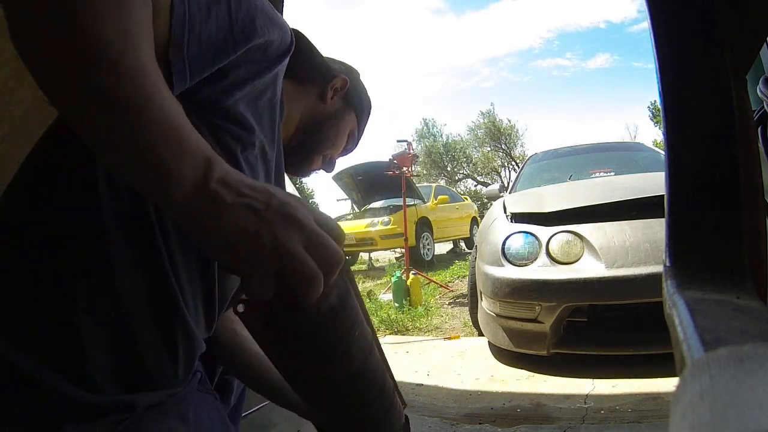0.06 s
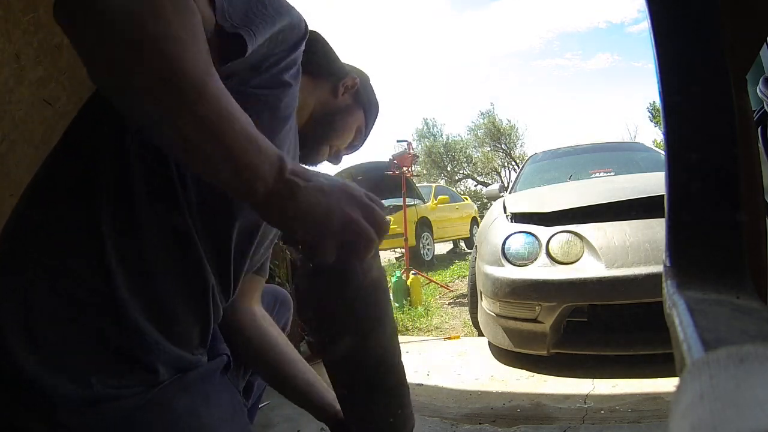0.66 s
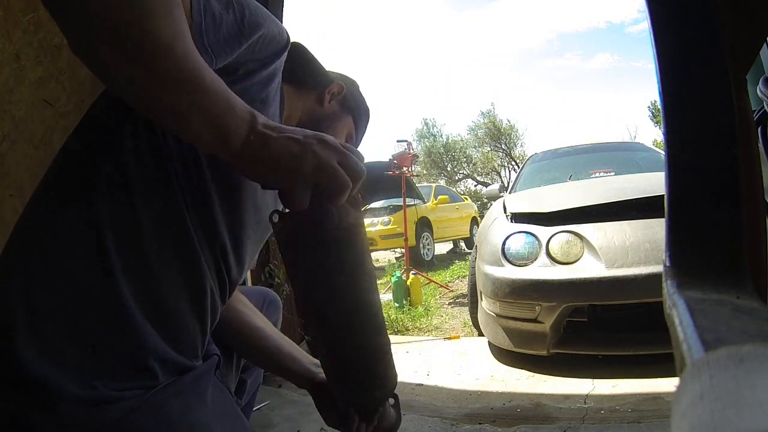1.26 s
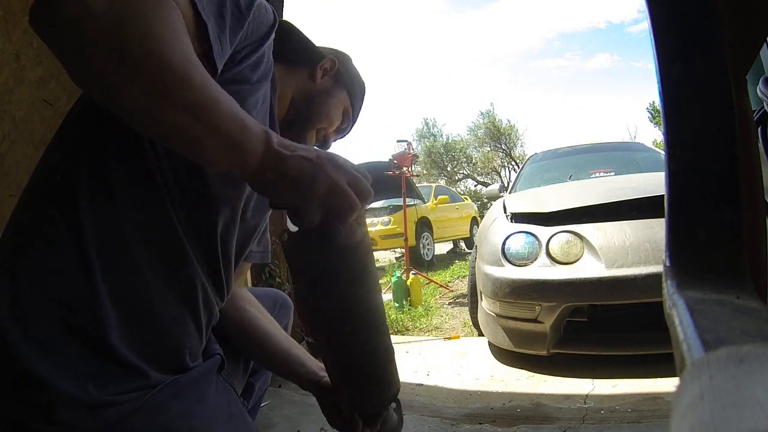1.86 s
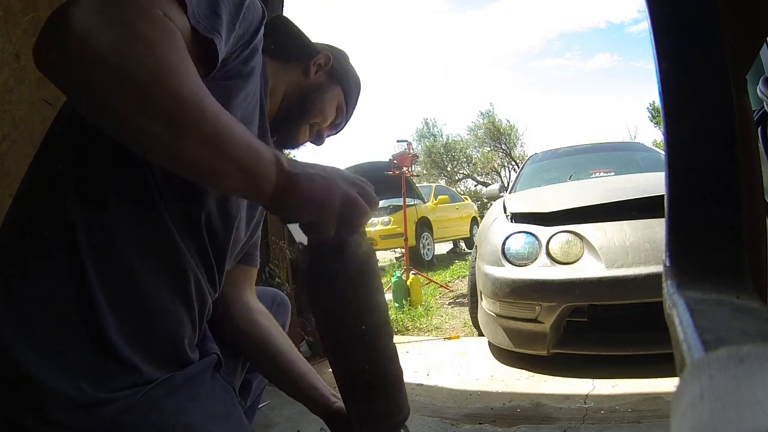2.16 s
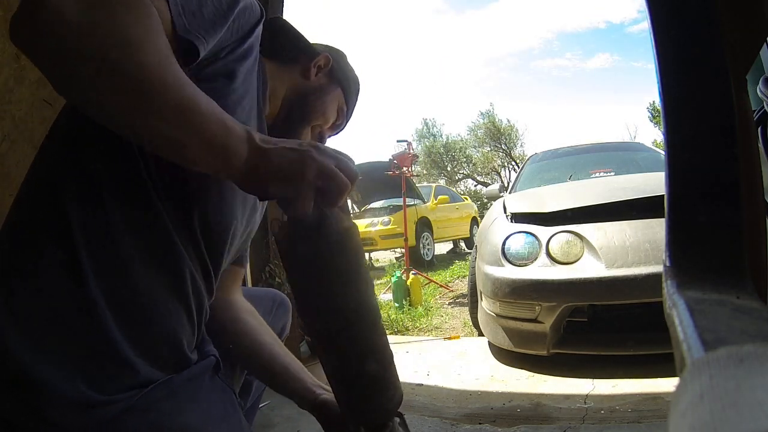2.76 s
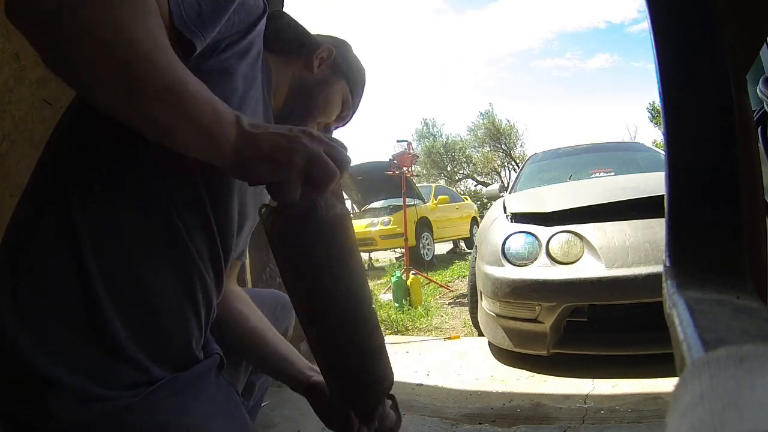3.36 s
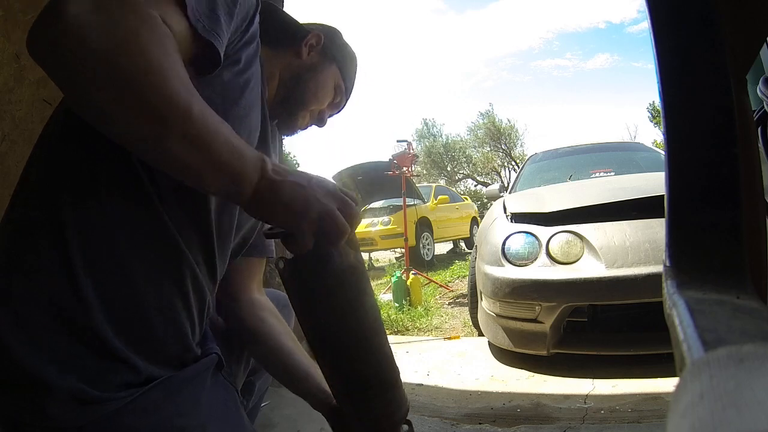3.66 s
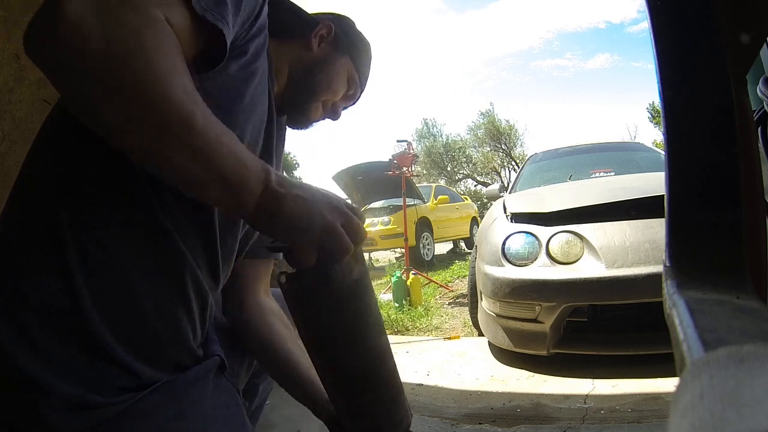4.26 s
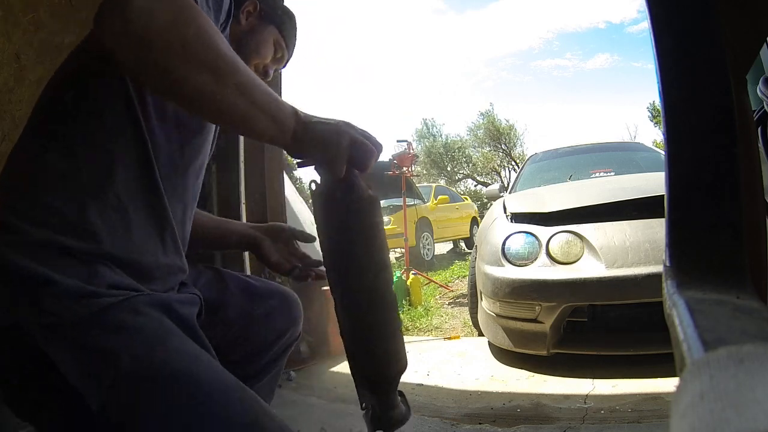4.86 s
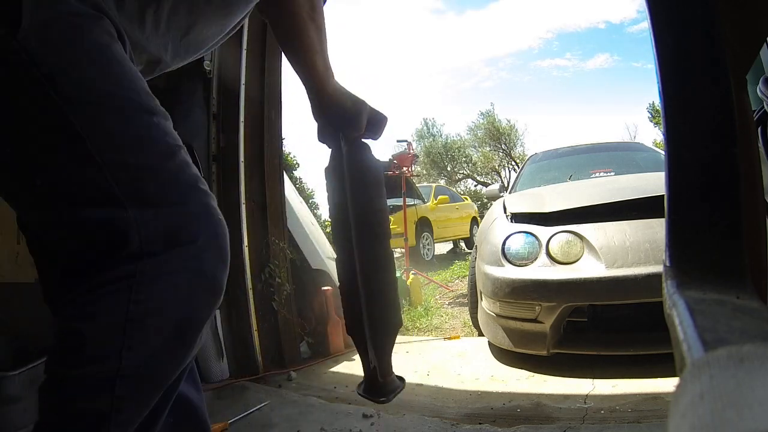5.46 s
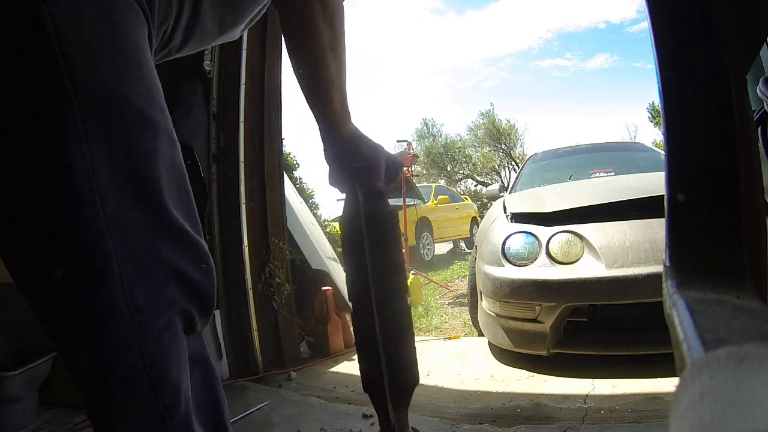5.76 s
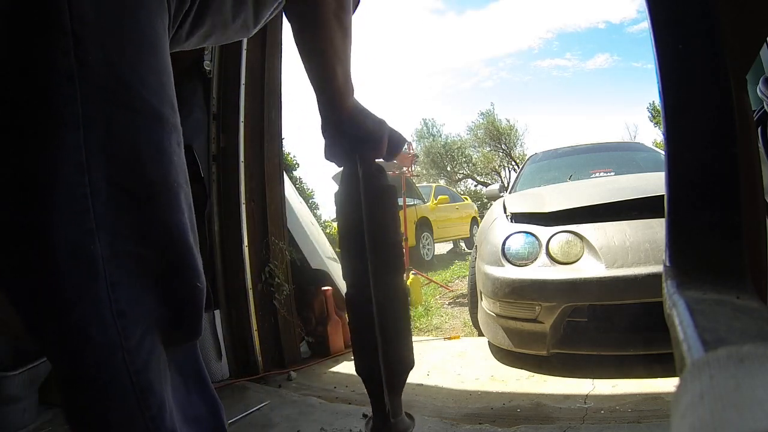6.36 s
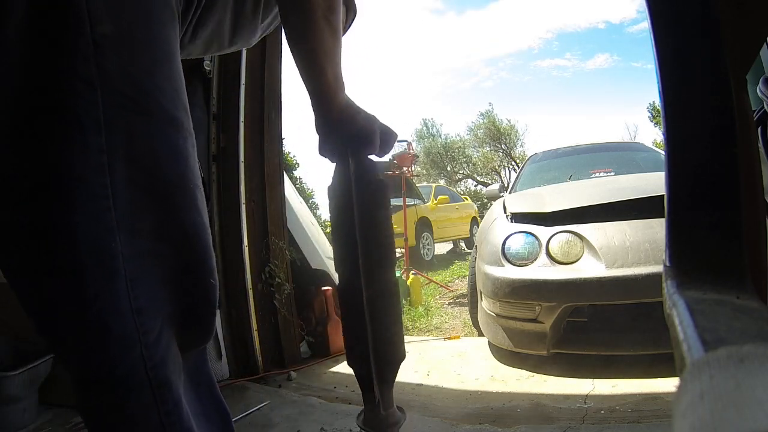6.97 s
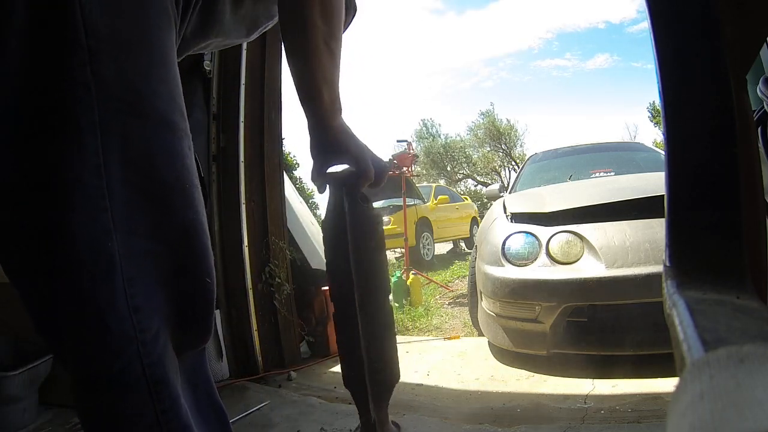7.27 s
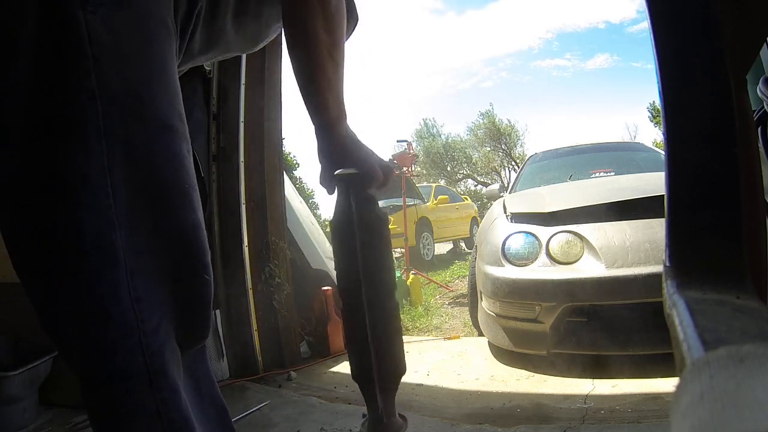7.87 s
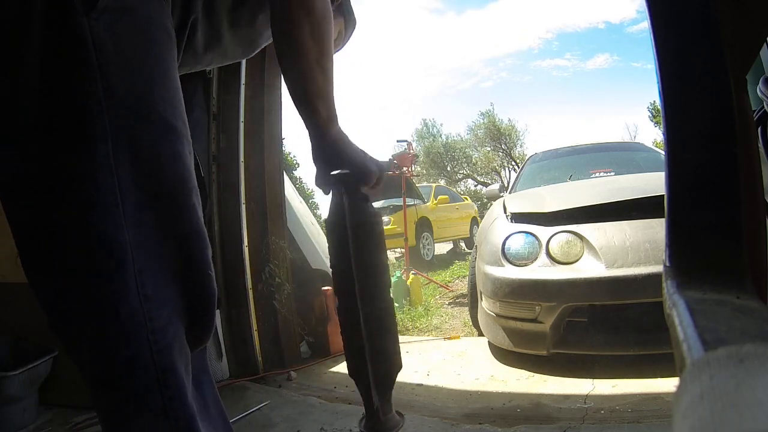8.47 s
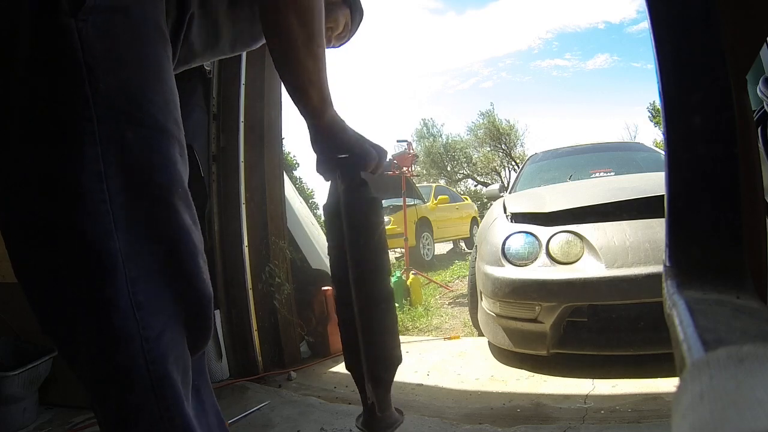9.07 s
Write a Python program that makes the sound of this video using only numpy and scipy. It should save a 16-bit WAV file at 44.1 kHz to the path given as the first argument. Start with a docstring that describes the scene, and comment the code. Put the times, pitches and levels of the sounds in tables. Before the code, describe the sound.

Loose ceramic chunks knock, clack and scrape inside a steel exhaust part shaken about five times a second. At first the metal ring is short and damped. Halfway through, the rattling stops briefly, then resumes with a longer ring between the blows. Soft puffs of air come from the pipe. The sound is close, in an open garage with little echo, over a faint outdoor hush and light wind on the microphone.

```python
"""Over a quiet yard and a gusty draught, a catalytic converter is shaken in an open garage. From the first
stroke, about five a second, chunks of its broken ceramic core knock on the steel can, clack together and
scrape along it, pushing puffs of air through the pipe. Two hands hold the can and keep its ring short.
Near 3 s it bumps something soft, and near 5 s it rests. From 5.5 s it is shaken hanging from one hand,
so a low note of its wall rings on between the blows."""
import sys
import numpy as np
from scipy import signal
from scipy.fft import rfft, irfft, next_fast_len
from scipy.io import wavfile
from scipy.ndimage import uniform_filter1d

SR = 44100
rng = np.random.default_rng(int(sys.argv[2]) if len(sys.argv) > 2 else 0)


def dump_mix(stems):
    """Bounce the given channels to the path in sys.argv[1] as a 16-bit WAV at rate SR."""
    frames = np.atleast_2d(stems).T  # one column per channel
    limited = np.clip(frames, -1, 1)  # hard clip at full scale
    pcm = np.round(limited * 32767).astype(np.int16)
    wavfile.write(sys.argv[1], SR, pcm)


N = 402191
TIME = np.arange(N) / SR
AGE = np.arange(int(.6 * SR)) / SR  # seconds since a hit
HANG_S = 5.5  # from here on the can hangs from one hand

# Levels are relative: each layer gets its own gain later. t60 is the time a sound takes to fall 60 dB.
# Tone colours of the yard, the draught and a thin, steady hiss: f/Hz, level/dB
YARD_SPECTRUM = [(15, -46), (25, -9.5), (75, -16), (115, -9), (167, -14.5), (363, -21), (404, -15.5),
                 (438, -24), (729, -27.5), (879, -24), (1280, -31.5), (3630, -35), (7480, -39),
                 (15000, -57)]
WIND_SPECTRUM = [(15, -1), (30, 3.5), (45, -6.5), (70, -3), (120, -23), (250, -47.5)]
HISS_SPECTRUM, HISS_DB = [(7000, -17), (7600, 1.5), (8200, -19)], -72
# Gusts of draught: t/s, half width/s, level/dB
GUSTS = [(.94, 0.12, -40), (1.43, .04, -56), (3.32, .075, -38), (3.7, .08, -51), (6.29, .06, -44),
         (6.74, .05, -46), (6.91, 0.034, -42), (7.33, 0.05, -48), (7.62, .06, -45), (7.88, 0.043, -42),
         (8.43, .09, -44), (9.03, .06, -41)]
# Strokes of the hand: landing t/s, air puff/dB, landing scrape/dB, slide scrape/dB, grit versus scrape/dB
STROKES = [(0.051, -33.5, -16.5, -27, -6), (0.28, -36, -25.5, -27, -8.5), (0.54, -37, -16, -26.5, -11.5),
           (0.762, -39, -16, -23.5, -10.5), (0.971, -41, -13.5, -26, -8.5), (1.221, -41, -15, -22.5, -10.5),
           (1.44, -39, -16.5, -17, -8.5), (1.669, -40, -14.5, -20, -9.5), (1.872, -31.5, -17, -19.5, -9),
           (2.098, -41, -18.5, -16.5, -9.5), (2.289, -37, -13, -21.5, -8), (2.48, -35, -13, -20.5, -10),
           (2.662, -33, -27, -22.5, -12), (2.891, -33, -15.5, -24.5, -6.5), (3.11, -39.5, -14.5, -22, -9),
           (3.338, -39, -12.5, -19.5, -8.5), (3.57, -40.5, -36, -20, -11), (3.711, -31, -13.5, -16, -9),
           (3.93, -32.5, -10.5, -21.5, -7.5), (4.122, -36.5, -9.5, -21, -12),
           (4.338, -37.5, -20, -16.5, -11.5), (4.519, -42.5, -17, -30, -10), (5.41, -45, -32, -55, -9),
           (5.718, -40, -10.5, -21, -5), (5.919, -35, -17.5, -28, -5), (6.129, -35.5, -14.5, -19.5, -7),
           (6.331, -42, -15, -43, -5.5), (6.56, -36, -16.5, -20.5, -0.5), (6.74, -37, -10, -24, -4.5),
           (6.939, -37.5, -13.5, -25, -4.5), (7.132, -40, -12.5, -35, -4.5), (7.329, -41, -10.5, -18.5, -7),
           (7.548, -29.5, -14.5, -14, -4.5), (7.74, -37.5, -13, -21.5, -4), (7.92, -47, -12.5, -18.5, -9.5),
           (8.141, -57, -12.5, -20.5, -13), (8.351, -48.5, -18.5, -24.5, -4.5), (8.522, -44, -13, -26, -5),
           (8.74, -35, -19, -29.5, -4.5), (8.92, -35.5, -13, -39, -7), (9.11, -35, -12.5, -17.5, -6.5)]
# Shape of a stroke: slide's lead on the landing/s, slide's half width/s, settling speed/(dB/s)
STROKE_HELD, STROKE_HANGING = (.09, 0.043, 209), (0.074, 0.033, 193)
# Chunks hitting the can: t/s, ring/dB, grit/dB, first low note/dB, second low note/dB
KNOCKS = [(.006,-28,-48,-36,-29), (.048,-21,-32,-36,-27), (0.272,-20.5,-32,-57,-36.5),
          (.439,-24.5,-36,-57,-32.5), (.505,-19,-34.5,-30,-44), (.548,-18.5,-29.5,-33,-29.5),
          (.736,-23.5,-39,-40,-27.5), (0.838,-21,-39,-28.5,-22), (.875,-20,-39,-30,-36),
          (.911,-24,-34,-37,-34), (0.951,-19.5,-41,-59,-39), (1.007,-19,-33,-39,-36),
          (1.129,-29,-35,-34,-30), (1.169,-21.5,-29,-46,-32), (1.19,-20,-33,-48,-37),
          (1.253,-17.5,-34,-29,-28.5), (1.31,-20.5,-36,-39,-28), (1.355,-35,-25.5,-27.5,-29),
          (1.437,-16,-35,-38,-45), (1.467,-15.5,-29,-38,-29), (1.597,-25.5,-32,-32,-30),
          (1.649,-15.5,-25.5,-50,-45), (1.679,-25,-33,-45,-40), (1.714,-22.5,-32.5,-40,-26),
          (1.821,-18,-29,-45,-47), (1.847,-15.5,-26,-31,-36), (1.89,-18.5,-25,-40,-39),
          (1.974,-23.5,-28.5,-28.5,-31), (2.059,-15,-22.5,-52,-35), (2.173,-23,-34,-30.5,-32),
          (2.221,-17,-36,-24,-38), (2.27,-16,-24,-26,-37), (2.305,-14.5,-40,-28.5,-49),
          (2.358,-16.5,-26,-31,-26.5), (2.44,-36,-30,-25.5,-37), (2.464,-18,-26,-31,-26),
          (2.496,-20.5,-32,-26,-34), (2.524,-18.5,-33,-30,-31), (2.559,-16,-33,-35,-33),
          (2.653,-17.5,-29,-51,-29.5), (2.685,-17.5,-29.5,-34,-37), (2.788,-24,-37,-33,-38),
          (2.815,-21,-28,-26.5,-28), (2.874,-11.5,-21,-23.5,-26), (2.903,-21.5,-30,-30,-41),
          (2.974,-18.5,-30.5,-34,-27.5), (3.034,-18.5,-28,-47,-46), (3.07,-19,-33,-35,-35),
          (3.218,-17,-28.5,-25.5,-26), (3.289,-19,-36,-30,-42), (3.331,-30,-23.5,-52,-29),
          (3.388,-19.5,-22.5,-31,-31), (3.453,-24,-38,-24,-36), (3.481,-16,-25.5,-29,-34),
          (3.518,-18,-26,-32,-33), (3.557,-13.5,-24,-29,-22), (3.691,-16,-25.5,-24.5,-30),
          (3.747,-13.5,-27,-33.5,-22), (3.864,-16.5,-27.5,-26,-30), (3.904,-17.5,-22,-25.5,-28),
          (4.058,-16.5,-43,-21,-27), (4.103,-13,-22.5,-26,-32), (4.214,-21,-28.5,-25.5,-26.5),
          (4.295,-23,-29,-22.5,-31), (4.316,-19,-27.5,-20,-23), (4.341,-16,-29,-24,-24),
          (4.398,-27,-49,-39,-28), (4.461,-29,-44,-27,-27), (4.519,-19,-40,-37,-31),
          (4.606,-25,-58,-43,-59), (4.897,-53,-69,-44,-70), (5.046,-47.5,-55,-51,-63),
          (5.413,-26.5,-35,-49,-49), (5.546,-34,-39,-30.5,-33.5), (5.57,-21,-27,-34,-39),
          (5.621,-36,-32,-40,-43), (5.662,-16.5,-27,-29,-27), (5.694,-14.5,-22,-20.5,-20),
          (5.737,-23,-38,-22.5,-40), (5.795,-29,-33,-27,-27.5), (5.875,-16,-21.5,-25,-26),
          (5.897,-12,-21,-27,-20), (5.913,-38,-20.5,-16,-17.5), (6.013,-15.5,-32,-23.5,-18),
          (6.051,-20.5,-33,-32.5,-26), (6.093,-19,-24,-25.5,-50), (6.117,-11.5,-19.5,-23,-18),
          (6.138,-14,-28,-20,-26), (6.251,-19,-39,-35,-29), (6.289,-19.5,-32,-34,-46),
          (6.326,-20,-22,-35,-36), (6.347,-10.5,-22,-29,-16.5), (6.385,-17.5,-26,-20,-17.5),
          (6.506,-16,-27,-29,-42), (6.562,-16,-37,-22.5,-25), (6.654,-37,-37,-20.5,-24),
          (6.717,-13.5,-26,-34,-33), (6.745,-33,-26,-24,-21.5), (6.786,-18,-40,-29,-23),
          (6.807,-23,-41,-18.5,-16.5), (6.92,-11.5,-22,-30,-26), (6.943,-24,-30,-27.5,-21.5),
          (7.025,-19.5,-29,-26,-33), (7.099,-29,-35,-26,-40), (7.116,-19,-20,-22.5,-22.5),
          (7.245,-32,-40,-30,-29), (7.294,-18,-28,-27,-25), (7.319,-16,-20.5,-25.5,-18.5),
          (7.421,-25.5,-23.5,-32.5,-26), (7.459,-23,-28,-25,-17.5), (7.523,-11.5,-16,-34,-38),
          (7.574,-36,-43,-17.5,-13), (7.666,-20.5,-37,-30.5,-38), (7.72,-17,-25.5,-22.5,-36),
          (7.774,-12.5,-39,-28,-14.5), (7.86,-18.5,-42,-25,-23.5), (7.926,-11.5,-23,-36,-17.5),
          (8.04,-34,-38,-31.5,-33), (8.131,-12.5,-17.5,-22.5,-21.5), (8.335,-21,-28,-23.5,-29.5),
          (8.44,-21.5,-27.5,-27.5,-29), (8.488,-24,-31,-19.5,-24), (8.52,-16.5,-28,-25.5,-29),
          (8.72,-13,-21,-32.5,-20.5), (8.831,-26,-32.5,-24,-25), (8.875,-19,-29,-32,-31),
          (8.895,-14,-22,-30,-41), (8.911,-15,-20.5,-16.5,-16.5), (9.06,-26,-40,-24,-29),
          (9.103,-19.5,-17.5,-17,-12)]
# The can's modes, the notes it rings at by itself: f/Hz, level held/dB, level hanging/dB
CAN_MODES = [(620, -26, -22), (888, -5, -14), (1200, -1, -9), (1575, -2, -4), (1940, -5, 2.5),
             (2062, -2, -14), (2152, -3, -4), (2191, -6, 0), (2258, 2, 3), (2340, 2, 0), (2365, 2, 0),
             (2519, -18, -7), (2733, -2, 1), (2794, -8, -3), (2977, 2, 2), (3160, -9, 1), (3387, -2, 1),
             (3415, 3, 3), (3521, -8, -7), (3623, -12, -4), (3712, -12, -5), (3816, 0, 1), (4075, -14, 4),
             (4172, -18, -5), (4258, -15, -5), (4630, -7, -3), (4725, -2, -8), (4890, -6, -6),
             (5211, -20, -3), (5760, -21, -9), (7219, -26, -6)]
# Tone colours of the can's many crowded modes and of crunching ceramic: f/Hz, level/dB
CROWDED_SPECTRUM = [(120, -36), (350, -18.5), (620, -11.5), (730, -17), (890, 5), (1080, -13.5), (1400, 2),
                    (1650, 6.5), (1850, -9), (2300, 5), (2600, -1.5), (3400, 1), (4800, -2.5), (6200, -20)]
GRIT_SPECTRUM = [(4000, -5.5), (5500, 4), (7300, -1), (8200, -1), (10500, -5), (12500, -2), (14500, -10.5),
                 (15700, -19.5)]
# Chunks hitting each other: t/s, level/dB
CLACKS = [(.006,-17.5), (.215,-17), (.505,-19), (.712,-15), (.736,-12), (.95,-5), (.964,-19), (1.19,-15.5),
          (1.409,-17), (1.597,-20), (1.847,-27), (2.019,-19.5), (2.059,-6), (2.084,-14.5), (2.221,-24),
          (2.27,-10), (2.465,-9.5), (2.524,-17), (2.685,-19), (2.874,-19.5), (3.07,-15), (3.094,-16),
          (3.218,-16), (3.481,-11), (3.518,-21.5), (3.691,-13.5), (3.747,-23.5), (3.863,-14.5),
          (3.892,-13.5), (3.904,-10.5), (4.103,-12), (4.275,-13.5), (4.316,-11), (4.478,-12.5),
          (6.117,-23.5), (6.138,-11), (6.717,-18), (7.116,-19.5), (7.574,-22), (7.294,-23), (8.131,-26),
          (8.72,-21), (8.895,-16), (8.911,-17)]
# Two low notes of the wall: f/Hz, t60 held/s, t60 hanging/s, roughness while rubble scrapes (0-1)
LOW_MODES = [(872.3, 0.34, 2.5, 0.21), (1381.8, 0.27, 0.32, 0.58)]
# A chunk leans on the hanging wall and chokes its long low note: t/s, length/s
LEANS = [(5.924, 0.095), (6.14, .12), (6.75, .03), (6.825, 0.042), (7.21, .05), (7.37, .05), (7.603, .06),
         (7.79, 0.045), (8.35, 0.059), (8.485, 0.068), (8.753, 0.067), (8.933, 0.034)]
# Clear pings of the can or a shard: t/s, f/Hz, level/dB, t60/s
PINGS = [(0.019, 4780, -21, 0.13), (0.549, 2350, -12, 0.076), (1.251, 2710, -13, 0.064),
         (1.488, 3430, -17, 0.14), (1.682, 2266, -12, 0.066), (2.06, 3810, -13.5, 0.064),
         (2.225, 2250, -18, 0.32), (2.308, 3811, -18, 0.088), (2.372, 3530, -9, 0.063),
         (2.463, 2096, -15.5, 0.13), (2.88, 2320, -9, 0.024), (3.07, 2357, -13.5, 0.068),
         (3.217, 2930, -16.5, 0.12), (3.219, 3330, -11, 0.079), (3.559, 3410, -13.5, 0.23),
         (3.562, 4700, -4.5, 0.03), (3.905, 4650, -15, 0.076), (4.12, 2270, -8.5, 0.097),
         (4.339, 2950, -14.5, 0.1), (4.341, 2335, 2, 0.022), (4.519, 2900, -11, 0.087),
         (5.69, 7260, -24, 0.18), (5.694, 3750, -18, 0.15), (5.744, 3406, -15, 0.3),
         (5.897, 3400, -12, 0.096), (6.054, 7250, -22, 0.099), (6.139, 1945, -21, 0.75),
         (6.14, 3210, -12.5, 0.083), (6.334, 7235, -21, 0.11), (6.349, 2342, -21, 0.33),
         (6.564, 3320, -14, 0.048), (6.719, 2360, -14.5, 0.13), (6.919, 6640, -25.5, 0.23),
         (6.927, 4130, -13.5, 0.11), (7.113, 4030, -18.5, 0.15), (7.331, 4060, -17, 0.17),
         (7.335, 6270, -19.5, 0.11), (7.457, 2270, -18.5, 0.43), (7.536, 11150, -55, 0.18),
         (7.54, 5220, -22.5, 0.18), (7.667, 3400, -21, 0.43), (7.776, 3170, -15, 0.1),
         (7.926, 3381, -13, 0.12), (7.928, 4060, -13, 0.12), (8.133, 2266, -19, 0.27),
         (8.521, 4880, -24, 0.25), (8.729, 8463, -30, 0.15), (8.92, 12231, -22, 0.088),
         (8.926, 13458, -30, 0.14), (9.101, 2400, -15, 0.071)]
# Tone colour of air in the pipe: f/Hz, level/dB
PIPE_SPECTRUM = [(110, -27), (170, -13), (205, -1), (235, 2), (275, -17.5), (420, -15), (700, -16)]
# One dull bump of the whole can: t/s, level/dB, t60/s
BUMP = (3.126, -25, .07)
# Tone colour of that bump: f/Hz, level/dB
BUMP_SPECTRUM = [(140, -15), (250, -20), (450, 1), (650, -5), (900, -13)]


def undb(db):
    """Turn decibels into a gain to multiply by."""
    return 10 ** (np.asarray(db) / 20)


def unit(x):
    """Scale a sound so that its energy is 1."""
    return x / np.sqrt(np.sum(x ** 2) + 1e-18)


def fade(t, t60):
    """Die away by 60 dB every t60 seconds."""
    return np.exp(-np.log(1000) * t / t60)


def swell(t, width_s):
    """A bell-shaped rise and fall around t = 0."""
    return np.exp(-.5 * np.minimum(np.abs(t / width_s), 10) ** 2)


def add(out, s, x):
    """Mix x into out, starting at s seconds."""
    start = max(int(s * SR), 0)
    out[start:start + len(x)] += x[:max(N - start, 0)]


def noise(spectrum, size=N):
    """Noise of strength (rms) 1 with the given tone colour, falling away beyond its ends."""
    hz, db = np.transpose(spectrum)
    padded = next_fast_len(size)
    f = np.arange(padded // 2 + 1) * SR / padded + 1e-3
    edges = np.minimum(1, np.minimum(f / hz[0], hz[-1] / f)) ** 4
    gain = undb(np.interp(np.log(f), np.log(hz), db)) * edges
    x = irfft(rfft(rng.standard_normal(padded)) * gain, padded)[:size]
    return x / np.std(x)


def wander(rate):
    """Smooth random motion that changes course rate times a second."""
    step = int(SR / rate)
    x = uniform_filter1d(np.repeat(rng.standard_normal(N // step + 1), step), step)[:N]
    return x / np.std(x)


def flutter(t, width_hz):
    """A random wobble of size and phase: the unsteady grip of a rough surface."""
    span = max(int(SR / width_hz), 1)
    wobble = uniform_filter1d(rng.standard_normal((2, len(t))), span, mode="wrap") * np.sqrt(span / 2)
    return wobble[0] + 1j * wobble[1]


def ring(force, response):
    """The sound of a body pushed by a force, given its response to one tap."""
    return signal.fftconvolve(force, response)[:N]


def yard():
    """The steady hush outside, with a thin, high hiss."""
    return undb(-51.5) * noise(YARD_SPECTRUM) + undb(HISS_DB) * noise(HISS_SPECTRUM)


def draught(calm_db=-61.5):
    """Slow gusts from the open door rumble on the microphone."""
    gusts = sum(undb(db) * swell(TIME - s, width) for s, width, db in GUSTS)
    return (undb(calm_db) + gusts) * noise(WIND_SPECTRUM)


def shaking(pile_lead_s=0.0093, pile_db_per_s=390):
    """Rubble slides, then piles up at the can's end. Returns the gains of scrape, grit and air."""
    scrape, dust, air = np.zeros((3, N))
    for s, puff_db, land_db, slide_db, grit_db in STROKES:
        near = slice(max(int((s - .4) * SR), 0), int((s + .4) * SR))
        t = TIME[near] - s
        since_pile = t + pile_lead_s
        lead_s, width_s, settle_db_per_s = STROKE_HELD if s < HANG_S else STROKE_HANGING
        pile = undb(land_db + np.minimum(pile_db_per_s * since_pile, -settle_db_per_s * since_pile))
        slide = undb(slide_db) * swell(t + lead_s, width_s)
        puff = swell(t, width_s=0.016) + undb(-14.5) * swell(t, width_s=0.085)
        scrape[near] += pile ** 2 + slide ** 2
        # sliding crushes a little less grit than landing
        dust[near] += (pile * undb(grit_db)) ** 2 + (slide * undb(grit_db - 0.5)) ** 2
        air[near] += (undb(puff_db) * puff) ** 2
    return np.sqrt([scrape, dust, air])


def scrapes(motion, dust, can, grit, scrape_db, dust_db, catches_per_s=200):
    """Four rough pieces catch on the steel in fits and starts, each on its own spot."""
    out = np.zeros(N)
    for _ in range(4):
        catches = rng.random(N) < catches_per_s / SR
        sizes = undb(6.0 * np.clip(rng.standard_normal(N), -2, 2))
        taps = catches * sizes * rng.choice([-1, 1], N)
        force = taps / np.std(taps) * undb(3.55 * wander(35) - 2.0)
        out += undb(scrape_db) * ring(force * motion, can())
        out += undb(dust_db) * ring(force * dust, grit())
    return out


def steel_can(levels_db, mode_t60, crowd_t60, crowd_db, spot_db):
    """Returns a maker of rings: clear notes, mixed anew for each struck spot, over a short noisy wash."""
    hz = np.array(CAN_MODES)[:, :1]
    t = AGE[:len(AGE) * 2 // 3]
    t60 = mode_t60 * (2500 / hz) ** .3  # higher notes die sooner
    notes = np.sin(2 * np.pi * (hz * t + rng.random(hz.shape))) * fade(t, t60)

    def strike():
        weights = undb(levels_db + spot_db * rng.standard_normal(len(hz)))
        crowd = noise(CROWDED_SPECTRUM, size=len(t)) * fade(t, crowd_t60)
        return unit(unit(weights @ notes) + undb(crowd_db) * unit(crowd))
    return strike


def ceramic_grit(t60, spot_db, shard_db, crack_db, count):
    """Returns a maker of bright crunches: a dry crack and the many high notes of shards and seams."""
    t = AGE[:len(AGE) // 4]
    grit_hz, grit_db = np.transpose(GRIT_SPECTRUM)
    hz = np.linspace(grit_hz[0], grit_hz[-1], count) + 35 * rng.uniform(-1.4, 1, count)
    levels_db = np.interp(hz, grit_hz, grit_db)
    notes = np.sin(2 * np.pi * (hz[:, None] * t + rng.random((count, 1)))) * fade(t, t60)
    crack = unit(noise(GRIT_SPECTRUM, size=len(t)) * fade(t, 0.047))

    def strike():
        # each shard favours a few groups of nearby notes, so it has a pitch of its own
        favoured = uniform_filter1d(rng.standard_normal(count), size=6)
        change_db = spot_db * rng.standard_normal(count) + shard_db * favoured / np.std(favoured)
        weights = undb(levels_db + change_db) * rng.choice([-1, 1], count)
        return unit(unit(weights @ notes) + undb(crack_db) * crack)
    return strike


def blows(times, levels_db, strike, crush_t60, rise_s, span_s):
    """Each chunk crumbles briefly as it lands, with the energy of span_s seconds at its level."""
    out, t = np.zeros(N), AGE[:len(AGE) // 16]
    press = fade(t, crush_t60) * (1 - np.exp(-t / rise_s))
    for s, db in zip(times, levels_db):
        contact = rng.standard_normal(len(t)) ** 3 * press  # cubing makes the noise spiky
        hit = unit(signal.fftconvolve(contact, strike()))
        add(out, s, undb(db) * np.sqrt(span_s * SR) * hit)
    return out


def knocking(knocks, can, grit, knock_db, grit_db):
    """Chunks hit the wall: the steel rings and the ceramic crunches."""
    times, ring_db, crunch_db = knocks[:, :3].T
    rings = blows(times, ring_db, can, crush_t60=0.018, rise_s=0.0016, span_s=.012)
    crunches = blows(times, crunch_db, grit, crush_t60=0.028, rise_s=0.005, span_s=0.011)
    return undb(knock_db) * rings + undb(grit_db) * crunches


def clacks(knock_times, knock_db, hz, swell_s, rough, gain_db):
    """A chunk jams and slips against its neighbour: a hollow note that swells and dies in a blink."""
    # besides the listed clacks, every knock jostles the neighbours into a softer one
    jostle_db = knock_db + np.where(knock_times < HANG_S, -9, -26.5)
    events = np.vstack([CLACKS, np.column_stack([knock_times, jostle_db])])
    pitches = hz * (1 + .055 * rng.uniform(-1.06, 1, len(events)))
    out, t = np.zeros(N), AGE[:len(AGE) // 10]
    burst = (t / swell_s * np.exp(1 - t / swell_s)) ** 2
    tail = undb(-13) * fade(t, 0.065) * (1 - np.exp(-t / swell_s))
    for (s, db), pitch in zip(events, pitches):
        grip = burst * (1 + rough * flutter(t, width_hz=980)) + tail * flutter(t, width_hz=220)
        note = np.imag(grip * np.exp(2j * np.pi * pitch * t))
        add(out, s, undb(db + gain_db) * note / np.abs(note).max())
    return out


def wall_note(times, levels_db, mode, scraping, lean_t60=0.33):
    """Each landing chunk stops the wall's swing and starts a new one; hands and leaning chunks damp it."""
    hz, held_t60, free_t60, rough = mode
    last_hit = np.maximum(np.searchsorted(times, TIME, side="right") - 1, 0)
    leaning = sum((TIME > start) & (TIME < start + length) for start, length in LEANS)
    hanging_t60 = np.where(leaning, min(lean_t60, free_t60), free_t60)
    t60 = np.where(TIME < HANG_S, held_t60, hanging_t60)
    loss = np.cumsum(1 / t60) / SR  # grows by 1 with every t60 that passes
    loss_since_hit = np.abs(loss - np.interp(times, TIME, loss)[last_hit])
    size = undb(levels_db)[last_hit] * fade(loss_since_hit, 0.99)
    phase = np.cumsum(rng.standard_normal(len(times)) * np.where(times < HANG_S, 1.4, 1.05))
    smoothing = signal.butter(1, 60, fs=SR)  # softens the jump at each hit
    swing = signal.lfilter(*smoothing, size * np.exp(1j * phase)[last_hit])
    jostle = 1 + rough * scraping * (wander(81) + 1j * wander(63))
    return np.imag(swing * jostle * np.exp(2j * np.pi * hz * TIME))


def garage(x, t60, wet_db):
    """The walls add a short wash of echoes after 6 ms; the open door lets most of the sound out."""
    echoes = rng.standard_normal(len(AGE)) * fade(AGE, t60) * (AGE > .006)
    return x + undb(wet_db) * ring(x, unit(echoes))


def pings(gain_db, rise_s=.002):
    """A hard corner picks out one clear note of the can or of a shard."""
    out = np.zeros(N)
    rise = 1 - np.exp(-AGE / rise_s)
    for (s, hz, db, t60), phase in zip(PINGS, rng.random(len(PINGS))):
        note = np.sin(2 * np.pi * (hz * AGE + phase))
        add(out, s, undb(db + gain_db) * note * fade(AGE, t60) * rise)
    return out


def pipe_air(puffs):
    """The moving core pushes hollow puffs of air through the pipe."""
    return undb(-2.3) * puffs * noise(PIPE_SPECTRUM)


def bump(rise_s=.002):
    """The can knocks against something soft, with no ring."""
    s, db, t60 = BUMP
    out = np.zeros(N)
    shape = fade(AGE, t60) * (1 - np.exp(-AGE / rise_s))
    add(out, s, undb(db) * noise(BUMP_SPECTRUM, size=len(AGE)) * shape)
    return out


def scene():
    """Two bouts of shaking, held and then hanging, over the quiet of the yard."""
    knocks, modes = np.array(KNOCKS), np.array(CAN_MODES)
    times, ring_db, _, first_db, second_db = knocks.T
    held_knocks, held = times < HANG_S, TIME < HANG_S
    motion, dust, puffs = shaking()
    held_can = steel_can(modes[:, 1], mode_t60=0.15, crowd_t60=0.14, crowd_db=-0.5, spot_db=4.0)
    hanging_can = steel_can(modes[:, 2], mode_t60=0.24, crowd_t60=0.075, crowd_db=-3.0, spot_db=4.5)
    grit = ceramic_grit(t60=.12, spot_db=-1.5, shard_db=7.0, crack_db=-7.0, count=150)
    rattle = knocking(knocks[held_knocks], held_can, grit, knock_db=-1, grit_db=0)
    rattle += scrapes(motion * held, dust * held, held_can, grit, scrape_db=-12.5, dust_db=-13)
    rattle += knocking(knocks[~held_knocks], hanging_can, grit, knock_db=-1.5, grit_db=-1)
    rattle += scrapes(motion * ~held, dust * ~held, hanging_can, grit, scrape_db=-10.5, dust_db=-12)
    rattle += clacks(times, ring_db, hz=1619.5, swell_s=0.0039, rough=0.21, gain_db=3.5)
    rattle += bump()
    scraping = motion / motion.max()
    wall = undb(3.0) * wall_note(times, first_db, LOW_MODES[0], scraping)
    wall += undb(5.5) * wall_note(times, second_db, LOW_MODES[1], scraping)
    air = pipe_air(puffs)
    outside = yard() + draught()
    inside = garage(rattle + air, t60=0.3, wet_db=-21.0) + pings(gain_db=2.0) + wall
    return (inside + outside)[None]


def record(dry):
    """Round off the loudest peaks and cut the treble above 15450 Hz."""
    rounded = np.tanh(.7 * dry) / .7
    low_pass = signal.ellip(10, .2, 80, 15450, fs=SR, output="sos")
    return signal.sosfilt(low_pass, rounded)


dry = scene()
out = record(dry)
dump_mix(out)
```